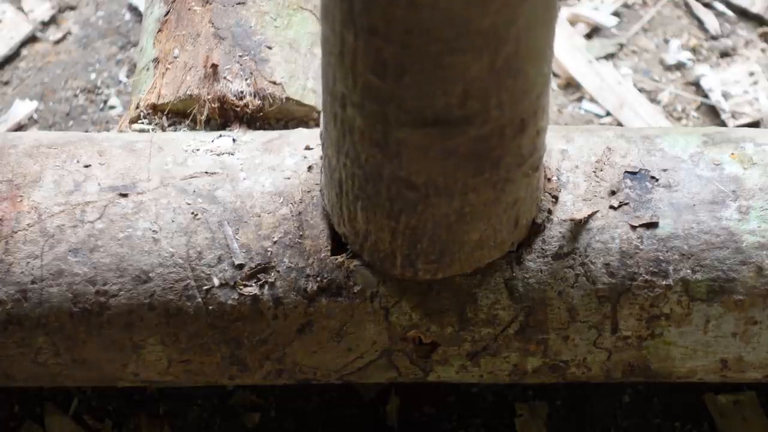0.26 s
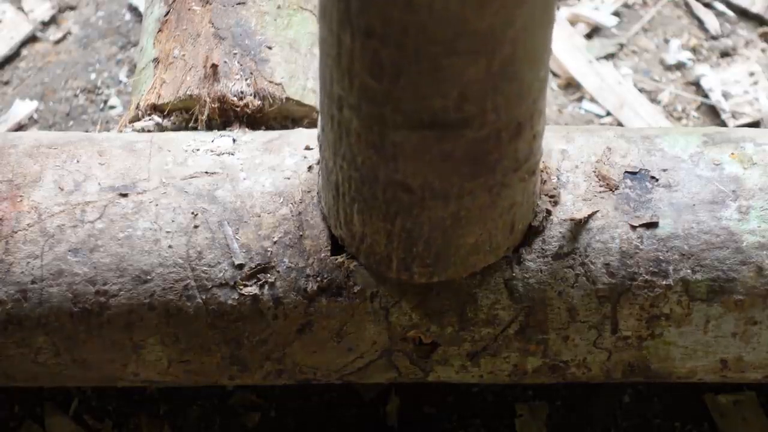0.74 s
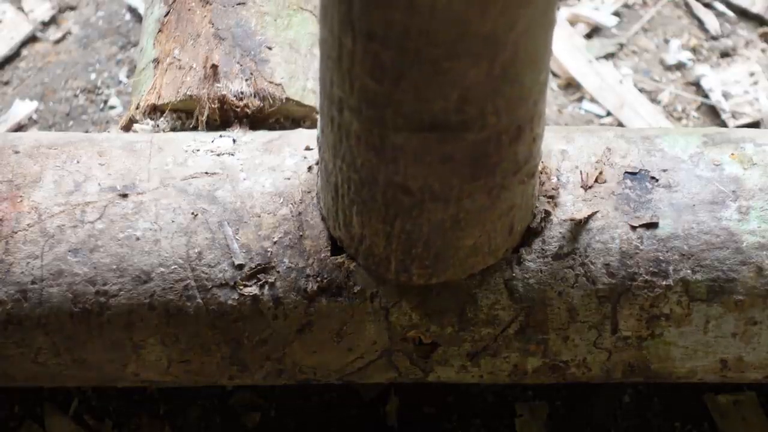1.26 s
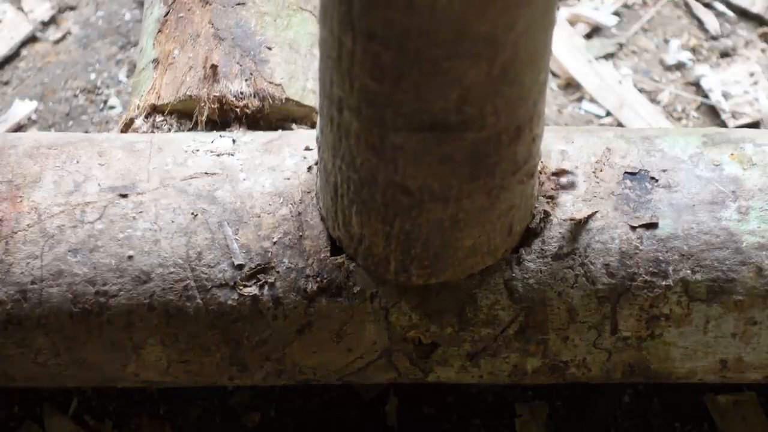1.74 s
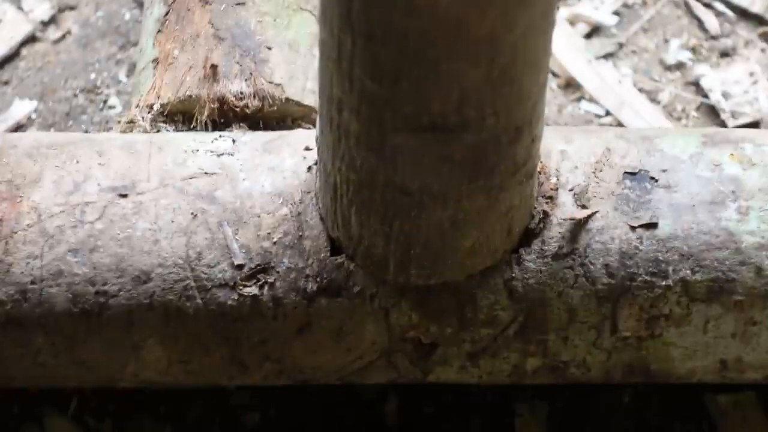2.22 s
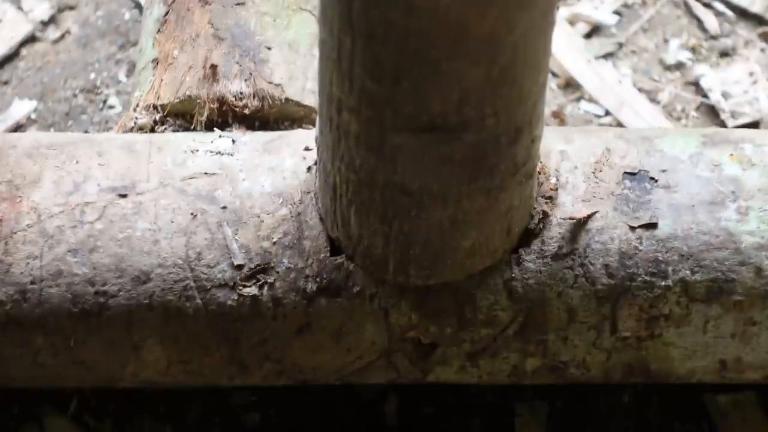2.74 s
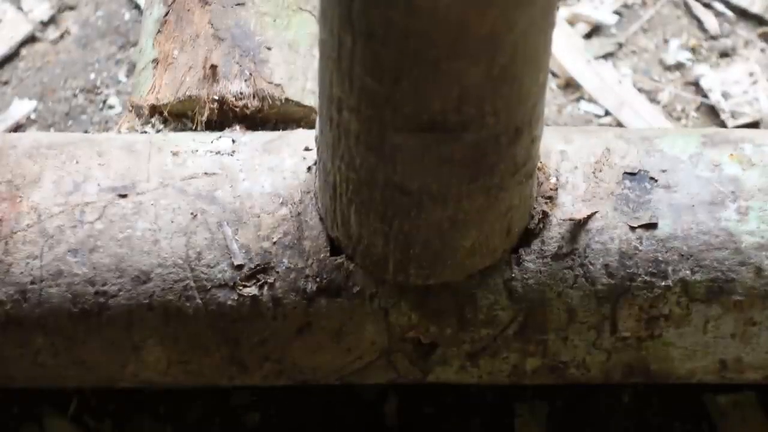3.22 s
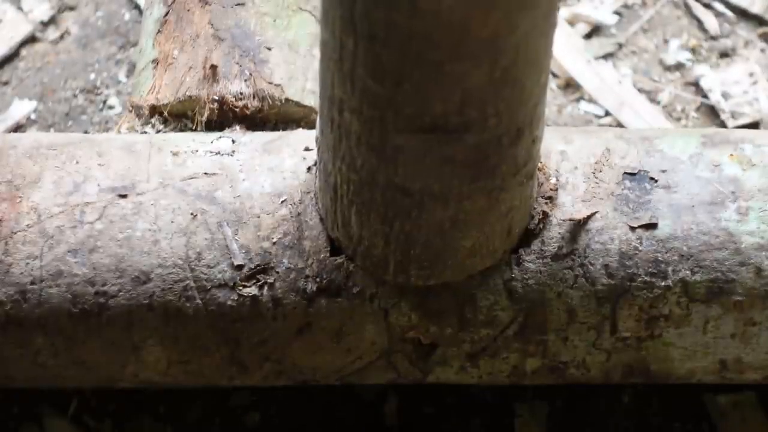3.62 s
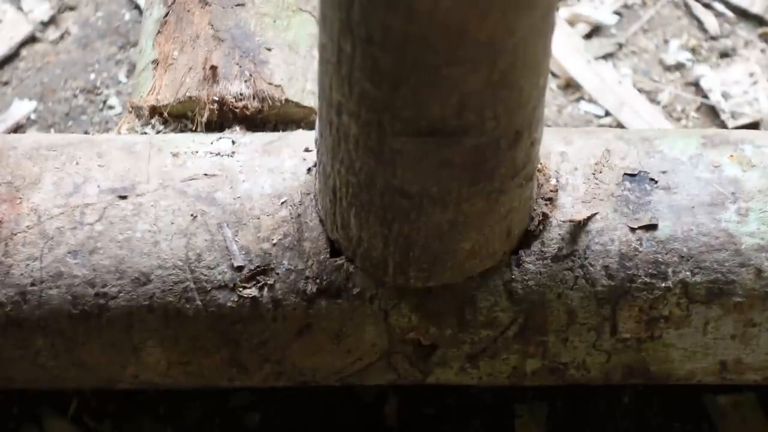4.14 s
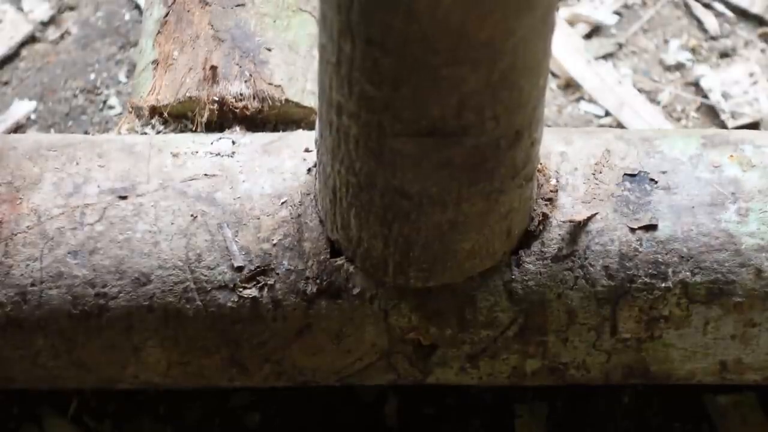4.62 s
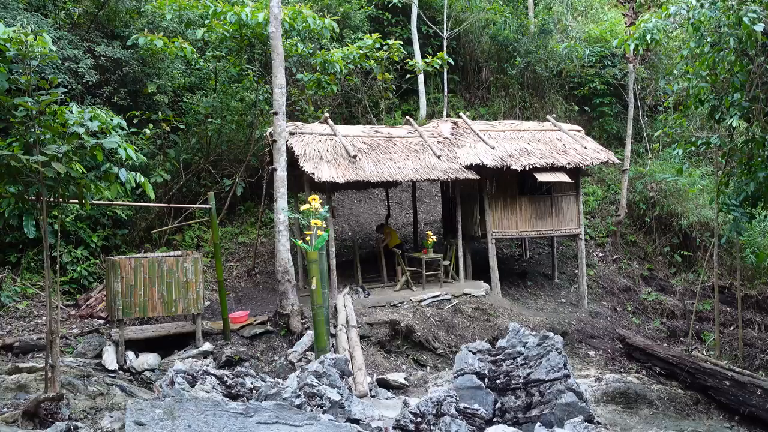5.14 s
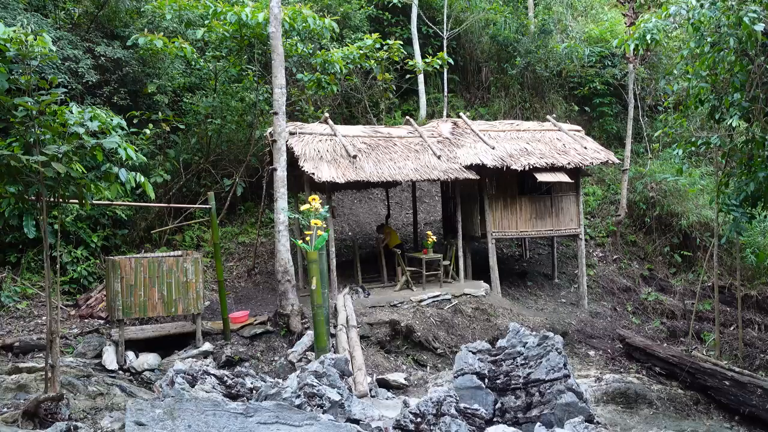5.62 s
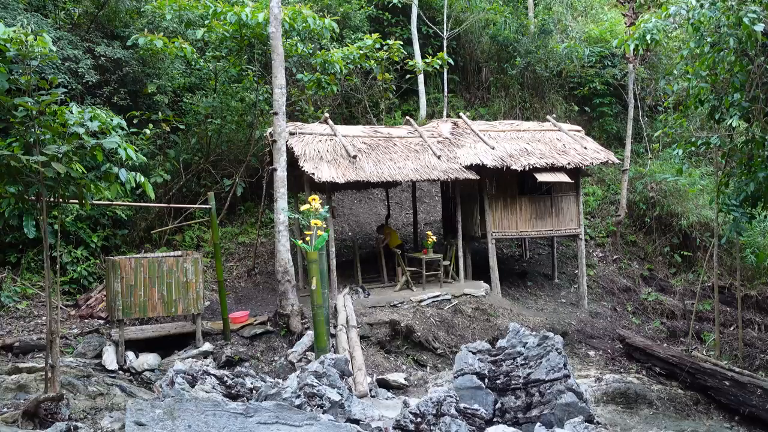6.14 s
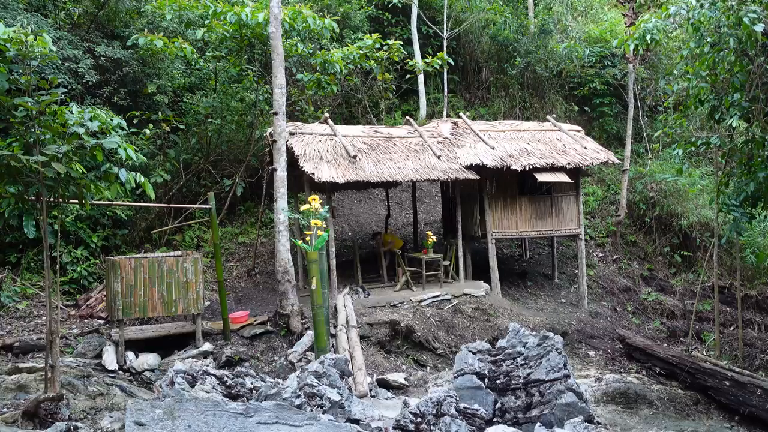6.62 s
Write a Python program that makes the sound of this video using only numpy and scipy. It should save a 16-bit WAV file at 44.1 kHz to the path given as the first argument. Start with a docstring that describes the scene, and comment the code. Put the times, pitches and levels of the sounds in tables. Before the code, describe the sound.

Outdoors in a forest, with the microphone near the timber: a regular run of seven strong woody blows, slightly to the right, with short midrange ring and little deep bass. Small ticks and creaky rubs surround them over continuous shrill insects. After the last blow the wood only stirs lightly. The scene then switches suddenly to a clearing without any knocking, where a steady high cicada pulses rapidly over a slowly swelling chorus and faint blips.

```python
"""Insects hiss steadily and loose wood taps lightly; then seven blows drive a wooden post into a log.
Each blow is a crack of noise, rattling noise of the frame and ringing tones of the timber.
Fibres snap, wood rubs and bumps, and the forest answers with lumpy echoes of noise.
Then the scene changes to the open clearing: another chorus, a growing drone, faint blips
and one cicada, whose buzz is ringing noise pulsed by its strokes."""
import sys
import numpy as np
from scipy import signal
from scipy.fft import rfft, irfft, next_fast_len
from scipy.io import wavfile
from scipy.ndimage import uniform_filter1d

SR = 44100
rng = np.random.default_rng(int(sys.argv[2]) if len(sys.argv) > 2 else 0)


def transcribe(signal):
    """Save signal, clipped to [-1, 1], as a 16-bit WAV file at the path in sys.argv[1]."""
    frames = np.atleast_2d(signal).T
    limited = np.clip(frames, -1, 1)
    pcm = np.round(limited * 32767).astype(np.int16)
    wavfile.write(sys.argv[1], SR, pcm)


N = 302967
TIME = np.arange(N) / SR  # seconds
CUT_S = 4.772  # when the scene changes to the clearing


def amp(db):
    """Turns decibels into gain."""
    return 10 ** (np.asarray(db) / 20)


def unit(x):
    """Scales a signal to rms 1."""
    return x / np.sqrt(np.mean(x ** 2) + 1e-20)


def read(points, hz):
    """Reads a table between its points, along a log-frequency axis."""
    f, value = np.transpose(points)
    return np.interp(np.log(hz + 1), np.log(f + 1), value)


def level(start_db, db_per_s, since_s=0):
    """A gain that grows evenly in decibels from the time since_s."""
    return amp(start_db + db_per_s * np.maximum(TIME - since_s, 0))


def add(mix, s, sound):
    """Mixes a sound in at time s."""
    part = mix[:, max(round(s * SR), 0):][:, :sound.shape[-1]]
    part += sound[..., :part.shape[1]]


def pan(db):
    """Left and right gains for a left-minus-right level in dB."""
    return amp([[db / 2], [-db / 2]])


# How alike noise is in both ears: pitch_hz, likeness (0 to 1)
EAR_LIKENESS = [(100, 0.72), (1000, 0.42), (2500, 0.7), (7000, 0.59), (14000, 0.68)]


def noise(size, gain, same=None):
    """Stereo noise of rms 1 with the spectrum gain(Hz): a shared part plus an opposed part."""
    padded = next_fast_len(size, real=True)
    hz = np.fft.rfftfreq(padded, 1 / SR)
    mid, side = rfft(rng.standard_normal((2, padded)))
    likeness = read(EAR_LIKENESS, hz) if same is None else same
    likeness = np.clip(likeness, 0, 1)
    mid = mid * np.sqrt(1 + likeness)
    side = side * np.sqrt(1 - likeness)
    ears = np.array([mid + side, mid - side])
    return unit(irfft(ears * gain(hz), padded)[:, :size])


def shape(points):
    """The gain function of a spectrum table."""
    return lambda hz: amp(read(points, hz))


def band(centre, width):
    """The gain function of a resonance: half gain at 0.55 widths either side."""
    return lambda hz: 1 / (1 + ((hz - centre) / (0.55 * width)) ** 2)


def low_cut(x, hz):
    """Removes the bass, which a small source cannot radiate."""
    return signal.sosfilt(signal.butter(2, hz, "high", fs=SR, output="sos"), x)


def fade(x, ring, hold=0):
    """After the hold time each frequency dies at its own rate."""
    hz, t, z = signal.stft(x, SR, nperseg=256)
    z = z * amp(-60 * np.maximum(t - hold, 0) / read(ring, hz)[:, None])
    return signal.istft(z, SR, nperseg=256)[1][:, :x.shape[1]]


def rippled(points, ripple_db):
    """The gain function of a chorus: a spectrum table with fine, fixed random ripples across pitch."""
    grid = np.arange(0, SR / 2, 35)
    ripples = rng.standard_normal(len(grid)) * np.clip(grid / 2500, 0, 1)
    return lambda hz: amp(read(points, hz) + ripple_db * np.interp(hz, grid, ripples))


def flutter(x, patchy_db):
    """Many small voices come and go: random patches of loudness drift in time and pitch."""
    z = signal.stft(x, nperseg=1024, noverlap=768)[2]
    patches = uniform_filter1d(rng.standard_normal(z.shape[1:]), size=9, axis=0)  # across pitch
    patches = unit(uniform_filter1d(patches, size=12, axis=1))  # across time
    z = z * amp(patchy_db * patches)
    return unit(signal.istft(z, nperseg=1024, noverlap=768)[1][:, :N])


def swells(rows, length_s, hz, width_hz):
    """A narrow band of noise swells for length_s up to each time and fades again as long."""
    out, size = np.zeros((2, N)), int(2 * length_s * SR)
    for s, db in rows:
        sound = noise(size, band(hz, width_hz)) * np.hanning(size) ** 2
        add(out, s - length_s, amp(db) * sound)
    return out


# Tone of the insect hiss by the post: pitch_hz, level_db (relative, per Hz)
NEAR_HISS = [(30, -70), (120, -43), (250, -28.5), (550, -16), (850, -4.5), (1100, -12.5), (1900, -4),
             (2600, 1.5), (4200, 0.5), (6000, -4.5), (7200, -6), (8400, -11.5), (10000, -22.5),
             (15000, -35.5)]
# How loud that hiss is: start_db, growth_db_per_s
NEAR_HISS_LEVEL = (-41.5, 0.23)
# Steady insect bands by the post: pitch_hz, width_hz, level_db
STEADY_SINGERS = [(2550, 450, -53.5), (4796, 200, -52.5), (5620, 110, -59), (6880, 770, -47.5),
                  (7540, 340, -56)]


def near_chorus():
    """Insects by the post: a wide fluttering hiss plus steady narrow bands of noise."""
    hiss = flutter(noise(N, rippled(NEAR_HISS, ripple_db=2.4)), patchy_db=1.9)
    out = level(*NEAR_HISS_LEVEL) * hiss
    for hz, width, db in STEADY_SINGERS:
        out += amp(db) * noise(N, band(hz, width))
    return out


# What a tapped piece rings with: pitch_ratio (times its pitch), level_db, fade_s (to fall 60 dB)
TAP_RING = [(1, 4.5, 0.081), (.86, -12.5, 0.15), (1.13, -10.5, 0.078), (1.92, -3.5, 0.11)]
# Tone of a tap's dry tick: pitch_hz, level_db (relative, per Hz)
TAP_TICK = [(400, -3.5), (1900, 3), (3200, -6), (4800, -8), (8000, -24), (15500, -47)]


def tap(db, tick_db, thump_db, hz, thump_s=0.01, tick_s=0.01, ring_db=3, size=8000):
    """One light knock of loose wood: a noise thump, a hollow ring of fading tones and a noise tick."""
    t = np.arange(size) / SR
    ring = np.zeros(size)
    for ratio, mode_db, fade_s in TAP_RING:
        wave = np.sin(2 * np.pi * (ratio * hz * t + rng.random()))
        ring += amp(mode_db - 60 * t / fade_s) * wave
    thump = amp(thump_db) * noise(size, band(620, 290)) * np.exp(-t / thump_s)
    body = (thump + amp(ring_db) * ring) * (1 - np.exp(-t / 0.0016))
    tick = amp(tick_db) * noise(size, shape(TAP_TICK)) * np.exp(-t / tick_s)
    return amp(db) * (low_cut(body, hz=260) + low_cut(tick, hz=1880))


# Light taps on the timber: start_s, level_db, tick_db, thump_db, pitch_hz
LIGHT_TAPS = [(0.074, -50, 14, 0.5, 955), (0.164, -55, 18, -8, 890), (1.586, -53, 15, -12, 808),
              (1.905, -51, 15, -10, 890), (1.964, -50, 0, -14, 853), (2.039, -49, 1.5, -14, 796),
              (3.004, -47, 16.5, 1.5, 815), (3.428, -50.5, 18.5, 1.5, 896), (3.708, -46.5, 10, -3.5, 816),
              (3.892, -50, 11, -18, 815), (3.989, -46.5, 12, -15, 883), (4.315, -52, 0, -15, 840),
              (4.409, -63, 10, 6, 724), (4.639, -51, 10, -17, 830), (4.754, -50.5, 3.5, -2, 886)]


def taps():
    """Loose wood knocks lightly at set times."""
    out = np.zeros((2, N))
    for s, *knock in LIGHT_TAPS:
        add(out, s, tap(*knock))
    return out


def stirs(per_s=6, db=-56.5, spread_db=4, tick_db=9.5, thump_db=-11, hz=815, pitch_spread=0.056):
    """Loose wood keeps stirring: one faint tap at a random moment in each short time slot."""
    out = np.zeros((2, N))
    for slot in range(int(per_s * CUT_S)):
        louder, higher = rng.standard_normal(2)
        pitch_hz = hz * (1 + pitch_spread * higher)
        faint = tap(db + spread_db * louder, tick_db, thump_db, pitch_hz)
        add(out, (slot + rng.random()) / per_s, faint)
    return out


# Sideways lean of the blows, to the right: pitch_hz, left_minus_right_db
BLOW_LEAN = [(120, 0), (400, -1.2), (750, -2), (1150, -3.5), (2200, -1.5), (6000, 0)]


def recolour(x, low_db, body_db, high_db):
    """Where the blow lands sets its bass, body and treble; it comes from the right."""
    size = 2 * x.shape[1]
    hz = np.fft.rfftfreq(size, 1 / SR)
    points = [(400, low_db), (700, 0), (800, 0), (1000, body_db), (1400, body_db), (1900, high_db)]
    tone = amp(read(points, hz))
    lean = amp(read(BLOW_LEAN, hz) * [[.5], [-.5]])
    return irfft(rfft(x, size) * tone * lean, size)[:, :x.shape[1]]


# One row a blow: start_s, strength_db, low_thud_db, woody_body_db, brightness_db,
# rattle_s (of the joint), crack_db, slip_delay_s (until the joint slips)
POST_BLOWS = [(0.2064, -1, -2.5, 3, 1, 0.018, 3, 0.024), (0.7111, -2.5, -.5, 1.5, .5, 0.025, 3.5, .019),
              (1.2102, -1.5, -4.5, 1, 2.5, 0.033, 0, 0.022), (1.717, -1, 0.5, .5, 1.5, 0.021, 2.5, 0.029),
              (2.1955, 0.5, -1, 1.5, 1, 0.024, -1, 0.013), (2.678, 1, -2, 0.5, -2, .033, 2.5, 0.027),
              (3.1931, 1, -2.5, -.5, -2.5, 0.034, 2.5, 0.026)]
# What post and log ring with: pitch_hz, level_db, fade_s (to fall 60 dB, capped below), build_up_s
TIMBER_MODES = [(87, -45.5, 0.23, 0.027), (121, -23, 0.2, 0.1), (152, -33, 0.22, 0.051),
                (183.4, -34.5, 0.18, 0.048), (252, -34, 0.18, 0.016), (296, -34, 0.19, 0.018),
                (398.8, -25.5, 0.23, 0.017), (489, -21, 0.24, 0.05), (670, -22.5, 0.083, 0.0081),
                (751.6, -5.5, 0.13, 0.019), (777, -15, 0.12, 0.0055), (833, -24.5, 0.24, 0.0081),
                (976, -14, 0.13, 0.0089), (1030, -22, 0.18, 0.006), (1097, -25.5, 0.15, 0.011),
                (1177, -19, 0.11, 0.018), (1200, -14.5, 0.12, 0.0076), (1239.5, -17, 0.12, 0.011),
                (1320, -30, 0.049, .006), (1425, -28, .15, 0.0034), (1545, -25, 0.25, 0.0066),
                (1790, -35, .18, 0.00068), (1820, -25, .16, 0.0013), (1910, -29, .17, 0.0015),
                (1928, -22.5, 0.19, 0.0014), (2115, -37, 0.11, .004), (2250, -31, 0.32, .004),
                (2370, -23, .16, 0.0046), (2400, -40, .2, 0.0071)]
# Tone of the frame's dense rattle: pitch_hz, level_db (relative, per Hz)
FRAME_TONE = [(30, -32), (90, -43), (200, -34.5), (300, -12), (450, -7.5), (600, -14), (1050, 2),
              (1600, -4), (2300, -4.5), (3600, -15), (4600, -17.5), (7000, -31), (10000, -36), (15500, -50)]
# How long the frame rings: pitch_hz, fade_s (to fall 60 dB)
FRAME_FADE = [(100, 0.2), (500, 0.29), (1000, 0.14), (2200, 0.19), (5000, 0.21), (12000, 0.35)]
# Tone of the crack of contact: pitch_hz, level_db (relative, per Hz)
CRACK_TONE = [(60, -40), (400, -4), (1000, 1.5), (1900, 2.5), (3200, -6.5), (4800, -9), (8000, -22.5),
              (15500, -42)]


def blows(frame_db=-20.5, crack_db=-14.3, crack_s=0.0027, swell_s=0.0051, alike=0.35,
          ring_db=-3, phase_spread=0.45, size=16000):
    """Each blow cracks, sets the joint rattling for a moment and pumps the modes of the timber."""
    out, t = np.zeros((2, N)), np.arange(size) / SR
    own = noise(size, shape(FRAME_TONE), same=0.57)  # the same frame answers every blow
    share = np.clip(alike, 0, 1)
    hz, mode_db, fade_s, build_s = np.transpose(TIMBER_MODES)[:, :, None]
    # wood damps its higher modes sooner, so the cap falls with pitch
    fade_s = np.minimum(fade_s, .3 * (120 / hz) ** .27)
    # each mode builds up as the blow spreads through the log
    build = 1 - np.exp(-(t / build_s) ** 2)
    modes = amp(ring_db + mode_db - 60 * t / fade_s) * build * np.exp(2j * np.pi * hz * t)
    count = len(TIMBER_MODES)
    phases = rng.uniform(0, 2 * np.pi, count)
    # short waves reach the ears out of step
    phases = phases + rng.standard_normal((2, count)) * hz.T / 3500
    for s, db, low_db, body_db, high_db, rattle_s, sharp_db, _ in POST_BLOWS:
        fresh = noise(size, shape(FRAME_TONE), same=1.0)
        dense = np.sqrt(share) * own + np.sqrt(1 - share) * fresh
        rattle = fade(dense, FRAME_FADE, rattle_s) * (1 - np.exp(-t / swell_s))
        crack = noise(size, shape(CRACK_TONE), same=0.97)
        crack = crack * np.exp(-t / crack_s) * (1 - np.exp(-t / 0.00017))
        louder, later = rng.standard_normal((2, count))  # no two blows land alike
        push = amp(2.2 * louder) * np.exp(1j * (phases + phase_spread * later))
        ring = (push @ modes).real
        sound = amp(frame_db) * rattle + amp(crack_db + sharp_db) * low_cut(crack, hz=500) + ring
        add(out, s, amp(db) * recolour(sound, low_db, body_db, high_db))
    return out


# Tone of a snapping fibre: pitch_hz, level_db (relative, per Hz)
SNAP_TONE = [(300, -47), (1500, 0), (3000, -1.5), (4800, -4.5), (8000, -9), (15500, -32)]


def snaps(slip_db=-22, small_db=-31, spread_db=4.5, snap_s=0.0017, first_s=.009, size=2000, count=3):
    """Fibres give way in the joint: a crack as the post slips, plus weaker ones at random moments."""
    out, t = np.zeros((2, N)), np.arange(size) / SR
    envelope = np.exp(-t / snap_s) * (1 - np.exp(-t / .0003))
    for s, db, _, _, high_db, rattle_s, _, slip_s in POST_BLOWS:
        cracks = [(slip_s, slip_db)]
        for when, strength in rng.random((count, 2)):
            cracks.append((first_s + when * rattle_s, small_db + spread_db * (2 * strength - 1)))
        for delay_s, snap_db in cracks:
            gain = amp(snap_db + db + high_db)  # louder under a strong, bright blow
            add(out, s + delay_s, gain * envelope * noise(size, shape(SNAP_TONE)))
    return out


# How long the forest echoes: pitch_hz, fade_s (to fall 60 dB)
FOREST_FADE = [(100, 0.48), (300, 0.68), (1000, 0.85), (2500, 0.54), (8000, 0.57)]
# How a stretch of forest colours its echo: pitch_hz, level_db
FOREST_TONE = [(80, -3), (300, -3), (750, -6.5), (1100, -1), (2500, 2.5), (9000, -5)]


def forest(x, lumpy_db=2, swell_s=0.022, size=36000, count=4):
    """Trunks and slopes scatter sound back in lumpy noise tails, taking turns every half second."""
    t, out = np.arange(size) / SR, np.zeros((2, N))
    for k in range(count):
        lumps = amp(lumpy_db * unit(uniform_filter1d(rng.standard_normal(size), 500)))
        tail = fade(noise(size, shape(FOREST_TONE), same=0.94), FOREST_FADE)
        tail = tail * lumps * (1 - np.exp(-(t / swell_s) ** 2))
        turn = 1. * (np.floor(2 * TIME) % count == k)
        turn = uniform_filter1d(turn, size=1000)  # soft handover between tails
        out += signal.fftconvolve(x * turn, tail / np.linalg.norm(tail[0]), axes=1)[:, :N]
    return out


def diffuse(x):
    """Many scattering paths blur clean tones into a rough wash: random phases in time and pitch."""
    z = signal.stft(x, nperseg=768, noverlap=576)[2]
    z = z * np.exp(2j * np.pi * rng.random(z.shape[1:]))
    return 2 * signal.istft(z, nperseg=768, noverlap=576)[1][:, :N]


# One insect calls about twice a second: peak_s, level_db
INSECT_CALLS = [(0.503, -49), (1.082, -51), (1.586, -47), (1.971, -50), (2.576, -51.5), (3.041, -42),
                (3.447, -49), (3.905, -45), (4.168, -46), (4.46, -45)]


def calls():
    """Each insect call is the same short swell of a narrow noise band."""
    return swells(INSECT_CALLS, length_s=0.14, hz=3330, width_hz=270)


# Soft rubs of wood on wood: peak_s, level_db
WOOD_RUBS = [(.6, -49), (1.115, -49.5), (3.665, -49), (3.725, -45.5), (4.01, -52), (4.075, -52),
             (4.45, -52.5)]


def rubs():
    """Wood rubs on wood: short swells of noise, all alike in length and pitch."""
    return swells(WOOD_RUBS, length_s=.06, hz=1546, width_hz=240)


# Soft low bumps of the frame: start_s, level_db
FRAME_BUMPS = [(1.654, -65), (3.335, -57), (4.185, -58.5), (4.218, -62.5)]


def bumps(hz=237.5, bump_s=0.021, size=8000):
    """The frame bumps softly: a low tone that builds quickly and dies away."""
    out, t = np.zeros((2, N)), np.arange(size) / SR
    envelope = np.exp(-t / bump_s) * (1 - np.exp(-(t / 0.0053) ** 2))
    for s, db in FRAME_BUMPS:
        add(out, s, amp(db) * np.sin(2 * np.pi * hz * t) * envelope)
    return out


# Tone of the chorus in the clearing: pitch_hz, level_db (relative, per Hz)
FAR_HISS = [(30, -70), (90, -50), (135, -28), (185, -38.5), (450, -20.5), (800, -11.5), (1150, -13.5),
            (2200, -0.5), (4500, 0.5), (5800, -6.5), (7800, 1.5), (9000, -15.5), (11500, -28), (15000, -37)]
# How loud that chorus is: start_db (at the change), growth_db_per_s
FAR_HISS_LEVEL = (-45, 1)


def far_chorus():
    """The insects of the clearing: a wide fluttering hiss that slowly grows."""
    hiss = flutter(noise(N, rippled(FAR_HISS, ripple_db=1.75)), patchy_db=1.0)
    return level(*FAR_HISS_LEVEL, CUT_S) * hiss


# How loud the lower insect band is: start_db (at the change), growth_db_per_s
DRONE_GROWTH = (-64, 6.6)


def drone():
    """A lower insect band of noise that grows in the clearing."""
    return level(*DRONE_GROWTH, CUT_S) * noise(N, band(2290, 310))


def blips(per_s=13, size=1500):
    """Faint short tones scattered at random through the clearing."""
    out, t = np.zeros((2, N)), np.arange(size) / SR
    envelope = np.exp(-t / .004) * (1 - np.exp(-t / .001))
    for when, pitch, strength, side in rng.random((int(per_s * N / SR), 4)):
        hz, db = 1900 * 2.4 ** pitch, -48 + 8 * strength ** 2
        ring = np.sin(2 * np.pi * hz * t) * envelope
        add(out, when * N / SR, amp(db) * ring * pan(8 * side - 4))
    return out


# Resonances of the cicada's tymbal, its sounding plate: pitch_hz, width_hz, level_db (relative)
TYMBAL_BANDS = [(6520, 260, -6), (6780, 220, 0), (7010, 260, -1.5), (7230, 340, -7)]
# How loud the cicada is: start_db (at the change), growth_db_per_s
CICADA_GROWTH = (-41, 0.54)


def cicada(buzz_hz=53.4, ribs=8, depth=.8, ribs_depth=.55):
    """The tymbal buckles rib by rib in each stroke; the clicks pulse noise in its narrow resonances."""
    wander = unit(uniform_filter1d(rng.standard_normal(N), 6000))
    turns = buzz_hz * TIME + .012 * wander  # strokes so far, slightly unsteady
    stroke = 1 + depth * np.tanh(5 * np.sin(2 * np.pi * turns))
    clicks = 1 + ribs_depth * np.cos(2 * np.pi * ribs * turns)
    ring = sum(amp(db) * noise(N, band(hz, width)) for hz, width, db in TYMBAL_BANDS)
    ring /= np.sqrt(uniform_filter1d((ring ** 2).mean(0), 500))  # strokes are of nearly even strength
    buzz = unit(ring * np.sqrt(stroke * clicks + 0.18))
    return level(*CICADA_GROWTH, CUT_S) * buzz * pan(1.0)


def scene():
    """Work at the post, then a quick crossfade to the clearing."""
    loose_wood = (taps() + stirs() + bumps()) * pan(-2.9)
    wood = loose_wood + blows() + snaps() + rubs()
    echo = amp(-19.5) * diffuse(forest(wood))
    insects = (near_chorus() + calls()) * pan(-1.14)
    near = insects + wood + echo
    clearing = (far_chorus() + drone() + blips()) * pan(0.28) + cicada()
    far = np.clip((TIME - CUT_S) / 0.0067, 0, 1)
    return near * np.sqrt(1 - far) + clearing * np.sqrt(far)


def record(dry):
    """Rolls off the bass below about 50 Hz and cuts the treble above 15500 Hz."""
    treble_cut = signal.firwin(401, 15500, window=("kaiser", 9), fs=SR)
    return signal.oaconvolve(low_cut(dry, hz=50.6), treble_cut[None], "same")


dry = scene()
out = record(dry)
transcribe(out)
```